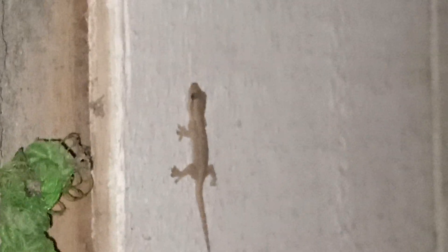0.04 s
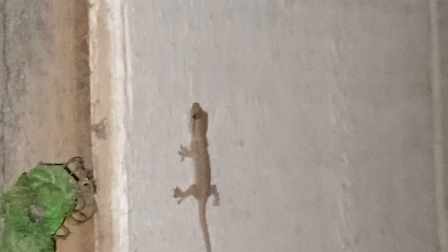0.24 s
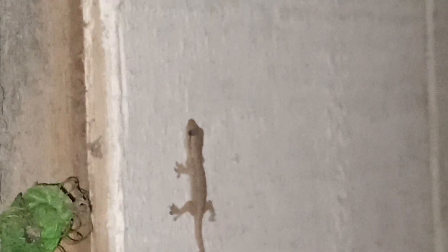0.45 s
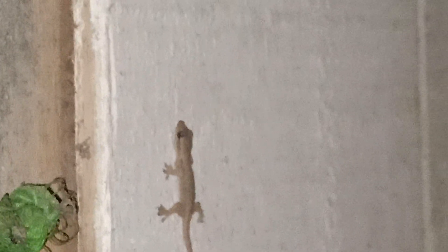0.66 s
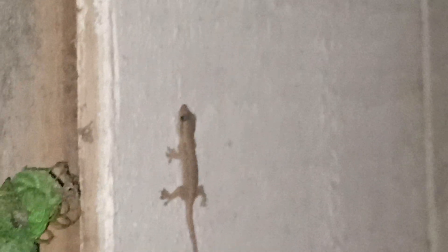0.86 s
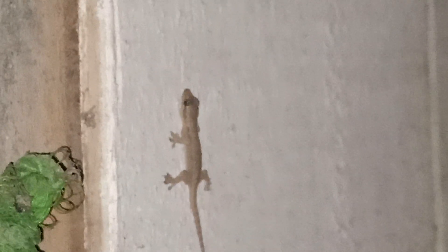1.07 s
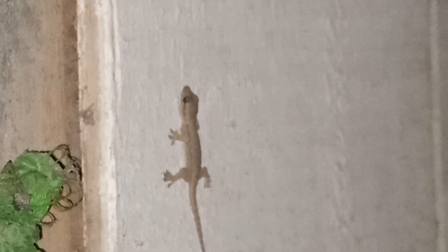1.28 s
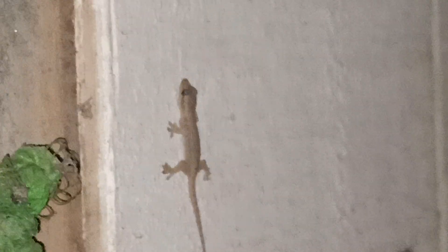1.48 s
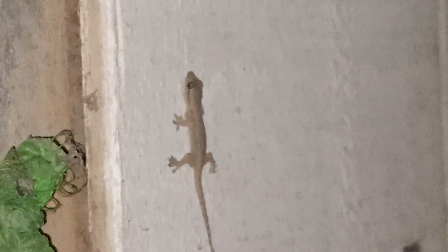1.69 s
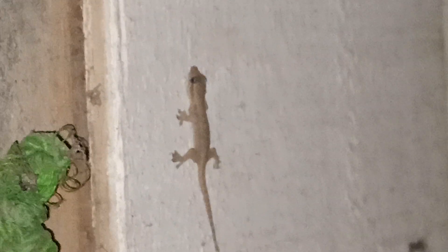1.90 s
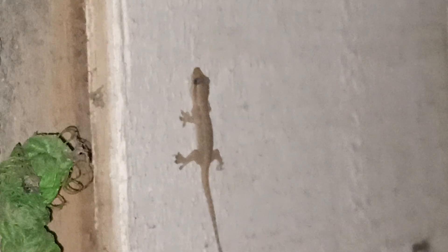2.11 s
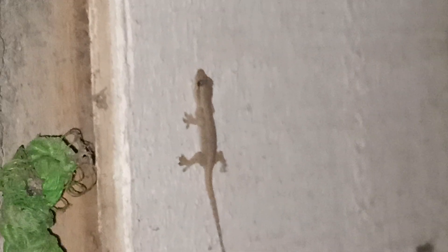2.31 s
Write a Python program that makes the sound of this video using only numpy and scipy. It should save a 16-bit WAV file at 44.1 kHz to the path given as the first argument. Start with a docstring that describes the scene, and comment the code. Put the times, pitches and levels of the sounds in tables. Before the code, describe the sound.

Crickets trill softly and continuously by a house wall at night. Just after the start, a finger scuffs the microphone with one loud knock on the right. The chorus carries on over a faint rumble of distant traffic.

```python
"""Night crickets by a house wall

A chorus of crickets trills with rasping wing strokes, and a higher one chirps five times a second.
A far engine throbs under a slowly rising wash of traffic. At the start a finger shifts on the camera
and scuffs over the right microphone port with a loud knock, which briefly pushes the limiter down."""
import sys
import numpy as np
from scipy import signal
from scipy.fft import rfft, irfft, next_fast_len
from scipy.io import wavfile
from scipy.ndimage import uniform_filter1d, minimum_filter1d, map_coordinates

SR = 44100
rng = np.random.default_rng(int(sys.argv[2]) if len(sys.argv) > 2 else 0)


def int16_out(signal):
    """Quantize to a 16-bit WAV file."""
    q = np.round(np.clip(np.atleast_2d(signal).T, -1, 1) * 32767)
    wavfile.write(sys.argv[1], SR, q.astype(np.int16))


N = 108045


def amp(db):
    """Decibels to gain."""
    return 10 ** (np.asarray(db) / 20)


def unit(x):
    """Scale to rms 1."""
    return x / np.sqrt(np.mean(x ** 2) + 1e-20)


def clock():
    """Seconds at each sample."""
    return np.arange(N) / SR


def along(points, hz):
    """Read a (frequency [Hz], value) curve on a log frequency axis."""
    freqs, values = np.transpose(points)
    return np.interp(np.log(hz + 1), np.log(freqs + 1), values)


def level(rows):
    """A fader ride: gain per sample from (time [s], level [dB]) rows."""
    return amp(np.interp(clock(), *np.transpose(rows)))


def wobble(rate):
    """A smooth random curve, rate knots a second."""
    return map_coordinates(rng.standard_normal(2048), [clock() * rate], mode="wrap")


def swell(centre, length):
    """A rounded rise and fall, timed in seconds."""
    return np.cos(np.pi * np.clip((clock() - centre) / length, -.5, .5))


def pan(db):
    """Left and right gains, db being left minus right."""
    return amp([[db / 2], [-db / 2]])


def filtered(x, response):
    """Shape the spectrum of x by response(hz)."""
    size = next_fast_len(N + SR // 2)
    return irfft(rfft(x, size) * response(np.fft.rfftfreq(size, 1 / SR)), size)[..., :N]


def coloured(x, points, size=8192):
    """Minimum-phase EQ from (frequency [Hz], gain [dB]) points: no ringing ahead of a hit."""
    cepstrum = irfft(np.log(amp(along(points, np.fft.rfftfreq(size, 1 / SR)))))
    fold = np.r_[1, np.full(size // 2 - 1, 2), np.zeros(size // 2)]
    impulse = irfft(np.exp(rfft(cepstrum * fold)))
    return signal.fftconvolve(x, impulse)[:N]


def noise(spectrum):
    """Mono coloured noise of rms 1."""
    return unit(filtered(rng.standard_normal(N), lambda hz: amp(along(spectrum, hz))))


def diffuse(spectrum):
    """Stereo noise from all around, centred in the bass and wide in the treble; rms 1."""
    # likeness of left and right: (frequency [Hz], correlation)
    likeness = [(130, 1), (290, 0.64), (640, 0.24), (1400, 0.082), (3100, 0.029), (8000, -0.057)]

    def mid_side_gains(hz):
        width = np.arccos(np.clip(along(likeness, hz), -1, 1)) / 2
        return amp(along(spectrum, hz)) * [np.cos(width), np.sin(width)]

    mid, side = filtered(rng.standard_normal((2, N)), mid_side_gains)
    return unit(np.array([mid + side, mid - side]))


def cricket(hz, sag_hz=420, rasp_hz=86):
    """Wing strokes, each a raspy tone falling by sag_hz, scattered by the yard; stereo, rms 1."""
    overtone_db, yard_t60_s, direct_gain = -35.5, 0.12, 0.36
    t, tail_len = clock(), SR // 4
    strokes_per_s = 55 * np.exp(0.13 * rng.standard_normal())
    stroke = (strokes_per_s * t + rng.random() + 0.054 * wobble(15)) % 1
    pitch = hz + rasp_hz * wobble(400) + sag_hz * (.5 - stroke)
    phase = 2 * np.pi * np.cumsum(pitch) / SR
    song = np.sin(np.pi * stroke) ** 2 * (np.sin(phase) + amp(overtone_db) * np.sin(2 * phase))
    tail = rng.standard_normal((2, tail_len)) * amp(-60 * t[:tail_len] / yard_t60_s)
    lead_in = np.pad(song, (tail_len, 0), "reflect")  # the yard is already ringing at the start
    wet = signal.fftconvolve(lead_in[None], tail, axes=1)[:, tail_len:tail_len + N]
    return unit(unit(wet) + direct_gain * song)


def cricket_pair(hz, detune_hz=130):
    """Two crickets trilling together, either side of one pitch."""
    return unit(cricket(hz - detune_hz) + cricket(hz + detune_hz))


def trilling_crickets():
    """Seven far crickets trill without a break while nearer pairs swell in and out."""
    # nearer trills: (centre [s], length [s], pitch [Hz], level [dB])
    trills = [(0.086, 0.11, 2752, -67.5), (0.137, 0.088, 2340, -70.5), (0.291, .13, 2540, -61.5),
              (0.404, .15, 2850, -66), (.64, 0.36, 2767, -78), (0.724, 0.32, 2527, -64.5),
              (0.97, .16, 2692, -70), (1.1, .15, 2430, -66.5), (1.327, 0.15, 2480, -71),
              (1.69, .29, 2720, -63), (1.995, .18, 2780, -64), (2.11, 0.16, 2722, -64),
              (2.37, 0.11, 2670, -68)]
    chorus = amp(-71) * unit(sum(cricket(hz) for hz in np.linspace(2273, 2695, num=7)))
    near = sum(amp(db) * swell(at, length) * cricket_pair(hz) for at, length, hz, db in trills)
    return pan(db=-2) * (chorus + near)


def chirping_cricket():
    """A higher cricket, dead centre, groups its wing strokes into five chirps a second."""
    offset_s, period_s, length_s = 0.17, 0.2013, .165
    chirps = sum(swell(offset_s + k * period_s, length_s) for k in range(-1, 13))
    return amp(-76) * chirps * cricket(hz=5080, sag_hz=440, rasp_hz=90)


def insect_haze():
    """Countless distant insects and air blur into a soft hiss."""
    # colour of the blur: (frequency [Hz], relative density [dB])
    haze_tone = [(900, -17.5), (1900, -9.5), (2200, -1), (2750, 0), (3150, -6), (3450, -14), (3750, -14.5),
                 (4200, -18.5), (4600, -15.5), (4950, -11.5), (5400, -16), (6100, -18), (6400, -24.5),
                 (7600, -23.5), (8300, -31), (9800, -33.5), (10300, -24), (11200, -27.5), (11900, -39.5),
                 (13400, -34), (15500, -46.5)]
    # its nearly flat ride: (time [s], level [dB])
    haze_ride = [(0, -70), (.45, -70), (.8, -69), (1.4, -69), (2.0, -70), (2.45, -70.5)]
    haze = level(haze_ride) * amp(0.29 * wobble(5.6)) * diffuse(haze_tone)
    return pan(db=-2.2) * haze


def far_engine():
    """An engine hums at multiples of its firing rate, and its rumble throbs with each firing."""
    # engine orders: (multiple of the firing rate, relative level [dB])
    orders = [(2, -10), (3, -9.5), (4, 1), (5, 4.5), (6, -7.5), (7, -11.5), (8, -6)]
    # ride of the hum: (time [s], gain [dB])
    hum_ride = [(0, -78), (.7, -75.5), (1.1, -74), (1.45, -70), (1.8, -73), (2.1, -66.5), (2.45, -73.5)]
    # colour of the rumble: (frequency [Hz], relative density [dB])
    rumble_tone = [(25, -29), (45, -14.5), (60, 3), (150, 6.5), (200, -11), (300, -7), (700, -41)]
    firing_hz, drift, throb_depth = 29.33, .005, 0.88
    phase = 2 * np.pi * np.cumsum(firing_hz * (1 + drift * wobble(5.8))) / SR
    hum = sum(amp(db + 1.3 * wobble(13)) * np.sqrt(2) * np.cos(k * phase + .5 * wobble(6.1))
              for k, db in orders)
    rumble = amp(-76) * (1 + throb_depth * np.cos(phase)) * diffuse(rumble_tone)
    return level(hum_ride) * hum + rumble


def traffic():
    """The wide, dark wash of a far road rises, then eases."""
    # colour of the road: (frequency [Hz], relative density [dB])
    road_tone = [(25, -37), (40, -8), (60, 0.5), (140, 4.5), (200, 2), (250, 3.5), (290, -4), (360, 0),
                 (510, 0), (600, -4), (1000, -9), (1500, -16), (2500, -15.5), (6000, -51.5)]
    # ride of the wash: (time [s], level before trim [dB])
    road_ride = [(0.3, -71.5), (0.31, -72), (0.8, -72), (0.86, -67.5), (1.2, -66.5), (2.03, -66),
                 (2.45, -69)]
    trim_db = 1.5
    return amp(trim_db) * level(road_ride) * diffuse(road_tone)


def finger():
    """Skin sticks and slips on the right port: sudden pressure drops, thumps, rubbing and rumble."""
    # slips on the port: (time [s], peak before port EQ [dB], rise [ms])
    slips = [(.1398, -42.5, 0.16), (.148, -32.5, 0.21), (0.2004, -13.5, 0.12), (0.2071, -14.5, .16),
             (0.2241, -9, .18), (.2266, 4, .15), (.2288, 10, .17), (0.2347, -5, 0.1), (0.2341, 1.5, .07),
             (0.2421, -15.5, 0.032), (.251, -17.5, 0.045), (.2535, -20.5, .12), (0.269, -41.5, 0.38)]
    # EQ of the covered port: (frequency [Hz], gain [dB])
    port_eq = [(20, -38), (45, -18.5), (90, -7), (150, -2), (290, 0), (420, 3), (620, 5), (760, 0.5),
               (950, 3), (1400, -1.5), (2700, 3.5), (4000, -3), (6000, -13.5), (9000, -14), (12000, -4),
               (14500, -12.5), (16000, -23)]
    # the finger's weight on the case: (centre [s], length [s], pitch [Hz], level [dB])
    presses = [(.09, 0.014, 100, -34), (0.15, 0.013, 245, -33), (0.206, 0.021, 290, -18.5),
               (.232, 0.017, 114.9, -10.5)]
    # rubbing between the slips: (time [s], level [dB])
    rub_ride = [(0, -97), (.1, -70.5), (.135, -53.5), (.152, -56), (.165, -88), (.192, -58.5), (.204, -33),
                (.212, -38.5), (.222, -31), (.234, -21.5), (.24, -32.5), (.254, -46), (.263, -78),
                (.3, -100)]
    # colour of rubbing skin: (frequency [Hz], relative density [dB])
    skin_tone = [(30, -50), (100, -5), (330, 1), (600, -3), (1000, -12.5), (2800, -12), (5000, -28.5),
                 (9000, -40), (12000, -36), (15500, -55)]
    # rumble of the gripping hand: (time [s], level [dB])
    grip_ride = [(0, -48.5), (.07, -52.5), (.095, -51), (.115, -43), (.15, -49), (.19, -44), (.23, -40.5),
                 (.255, -58.5), (.3, -86)]
    # colour of that rumble: (frequency [Hz], relative density [dB])
    grip_tone = [(20, -25.5), (50, -8.5), (90, 0), (150, -5.5), (250, -25.5), (600, -49), (2000, -81.5)]
    t, pressure, thumps = clock(), np.zeros(N), np.zeros(N)
    for at, db, rise_ms in slips:
        age = np.maximum(t - at, 0) * 1000 / rise_ms
        pressure -= amp(db) * age * np.exp(1 - age)
    for at, length, hz, db in presses:
        thumps -= amp(db) * swell(at, length) ** 2 * np.cos(2 * np.pi * hz * (t - at))
    rub = level(rub_ride) * unit(noise(skin_tone) * amp(2 * wobble(500)))
    grip = level(grip_ride) * noise(grip_tone)
    hard_right = amp([[-58], [0]])
    return hard_right * (coloured(pressure, port_eq) + thumps + rub + grip)


def ticks():
    """Two tiny dry ticks and a rustle nearby: bright noise that starts sharply and dies away."""
    # ticks and rustle: (time [s], level [dB], time to fall 60 dB [s])
    hits = [(0.425, -79, 0.026), (.634, -61.5, .011), (1.407, -74, 0.41)]
    # their colour: (frequency [Hz], relative density [dB])
    tick_tone = [(500, -2), (2000, -5.5), (4800, -5), (5600, 8), (6300, 1), (7500, -17), (11000, -20),
                 (14000, -13), (16000, -39)]
    t = clock()
    envelope = sum(amp(db - 60 * np.maximum(t - at, 0) / t60) * (t >= at) for at, db, t60 in hits)
    return pan(db=-5.5) * envelope * diffuse(tick_tone)


def motor_whines():
    """Wavering tones of motors on the far road come and go."""
    # faint whines: (centre [s], length [s], pitch [Hz], level [dB])
    whines = [(1.21, 0.32, 246, -66.5), (1.557, 0.24, 499.5, -72), (1.645, 0.4, 372, -74.5),
              (2.005, 0.57, 256, -71), (2.04, 0.52, 508.6, -81.5), (2.32, 0.5, 348, -70.5)]
    motors = np.zeros(N)
    for at, length, hz, db in whines:
        tone = np.sqrt(2) * np.sin(2 * np.pi * hz * clock() + 0.77 * wobble(9.4))
        motors += amp(db) * swell(at, length) * tone
    return motors


def thin_cricket():
    """One faint, thin trill swells and fades through the second half."""
    return pan(db=-2) * amp(-79.5) * swell(centre=1.8, length=1.3) * cricket(hz=3720.5, sag_hz=222)


def scene():
    """The stereo mix arriving at the two microphone ports."""
    insects = trilling_crickets() + chirping_cricket() + insect_haze() + thin_cricket()
    street = far_engine() + traffic() + motor_whines()
    return insects + street + finger() + ticks()


def record(dry):
    """Microphone overload rounds the peaks, then a stereo-linked look-ahead limiter and a high cut."""
    overload, ceiling, high_cut_hz = 2.7, .92, 16000
    hold_s, ramp_s = .055, .016
    saturated = dry / (1 + np.abs(dry / overload) ** 4) ** (1 / 4)
    safe_gain = ceiling / np.maximum(np.abs(saturated).max(axis=0), ceiling)
    held_gain = minimum_filter1d(safe_gain, int(hold_s * SR))
    gain = uniform_filter1d(held_gain, int(ramp_s * SR))
    return filtered(saturated * gain, lambda hz: hz < high_cut_hz)


dry = scene()
out = record(dry)
int16_out(out)
```